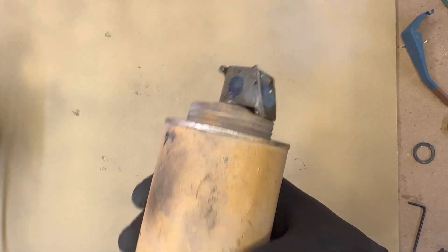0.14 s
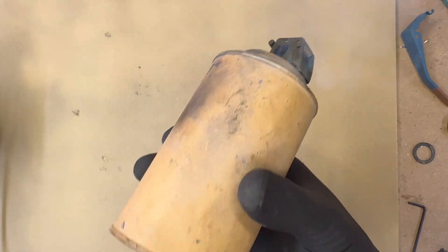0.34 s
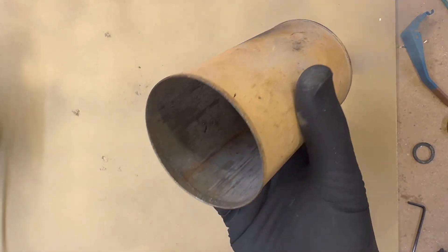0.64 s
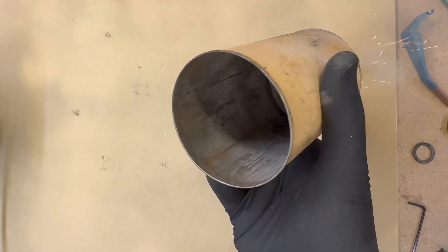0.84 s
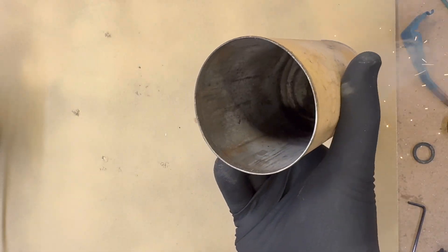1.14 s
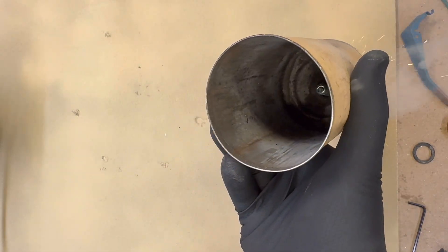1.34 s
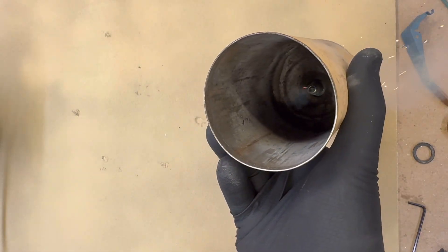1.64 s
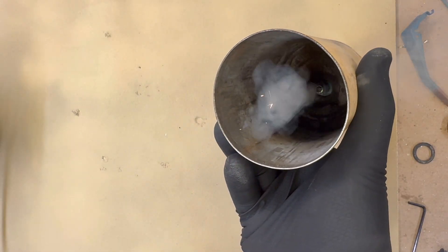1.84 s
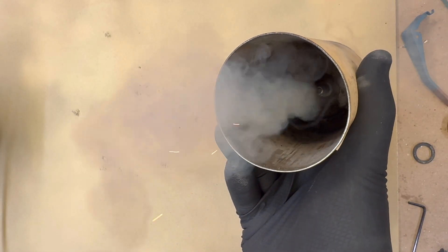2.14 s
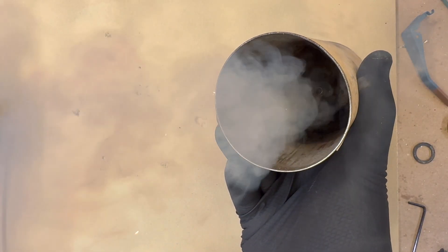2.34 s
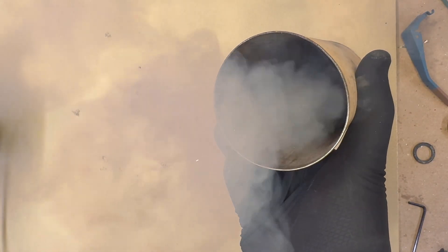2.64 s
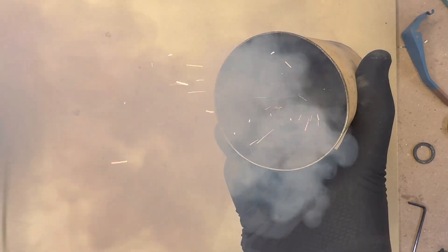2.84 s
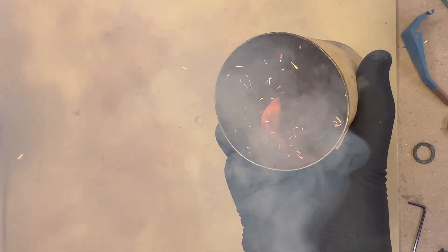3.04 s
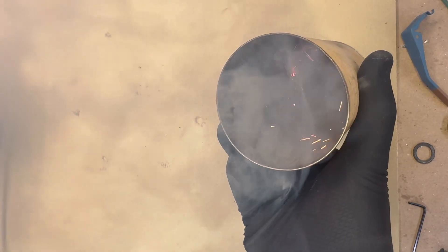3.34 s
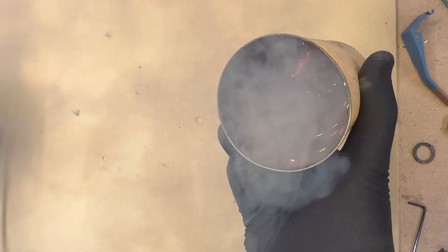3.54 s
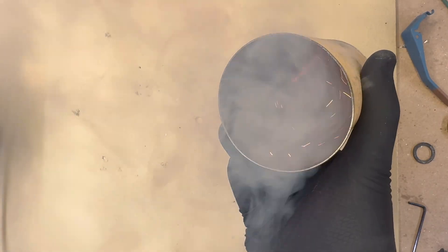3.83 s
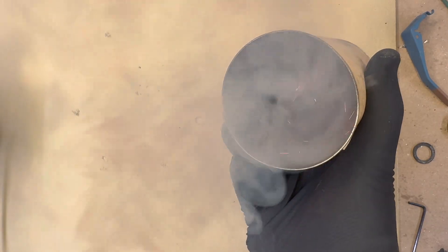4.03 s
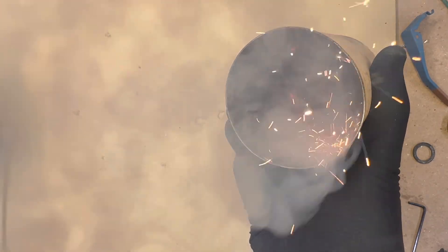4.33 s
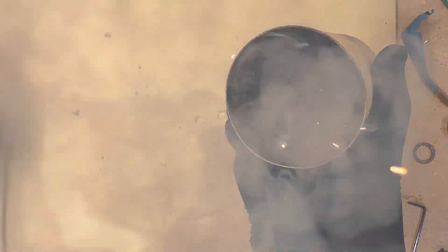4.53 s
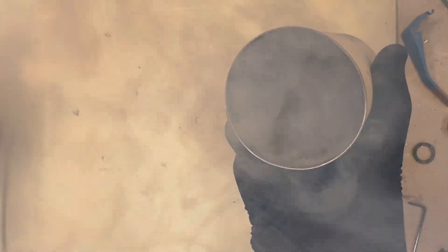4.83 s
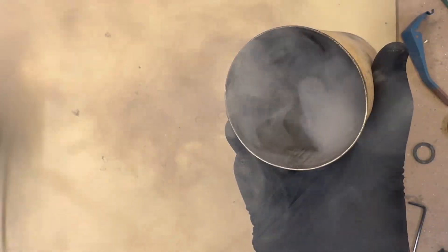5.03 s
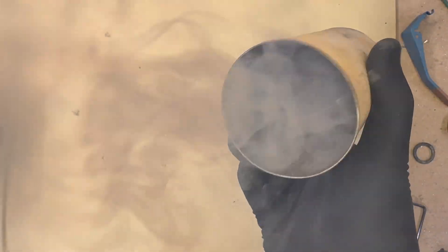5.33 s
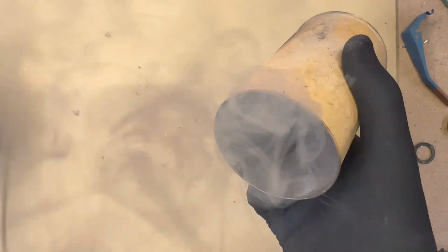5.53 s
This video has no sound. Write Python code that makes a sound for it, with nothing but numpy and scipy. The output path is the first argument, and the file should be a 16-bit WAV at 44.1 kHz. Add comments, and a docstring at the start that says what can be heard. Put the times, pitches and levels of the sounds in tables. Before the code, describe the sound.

A sharp metallic crack, a bright spitting hiss and a soft fizz lead to a brief hollow flare in a metal canister.

```python
"""Smoke grenade fuze in an empty can

A fuze fires in a steel canister held over a workbench. The primer's jet swells to a crack, then the
fuze head hisses and spits slag while the can is turned over. The delay charge fizzes inside the open
can, the ignition charge flares into a hollow roar and dies, and last sparks tick over a machine hum."""
import sys
import numpy as np
from scipy import signal
from scipy.fft import rfft, irfft, next_fast_len
from scipy.io import wavfile
from scipy.ndimage import map_coordinates

SR = 44100
rng = np.random.default_rng(int(sys.argv[2]) if len(sys.argv) > 2 else 0)


def to_wav(s):
    """Save 16-bit WAV."""
    ch = np.atleast_2d(s).T  # columns
    pcm = np.round(np.clip(ch, -1, 1) * 32767)  # PCM
    wavfile.write(sys.argv[1], SR, pcm.astype(np.int16))


N = 250355
TIME = np.arange(N) / SR


# The jet's bright hiss and its fuller body. Each row: frequency in Hz, relative level in dB.
JET_HISS_EQ = [(150, -29.5), (1000, -15.5), (3500, -9.5), (5300, -3), (6700, -9.5), (8000, 0), (9600, -0.5),
               (10500, 0.5), (14300, -6), (15500, -15.5)]
JET_BODY_EQ = [(30, -37.5), (130, -5), (500, -3.5), (800, -6.5), (1150, 1), (2100, -6), (2650, -7),
               (3300, -9.5), (6500, -4.5), (15000, -24.5)]
# The ring of the steel fuze head. Each row: frequency in Hz, width in Hz, relative level in dB.
HEAD_MODES = [(2690, 60, 7.5), (5630, 55, -5), (7770, 64, 1), (9190, 90, 1.5)]

def primer(crack_s=.221, end_s=.2435, attack_s=.011, t60=.022):
    """The primer flashes; its jet swells, blows the vent clear with a crack and rings the fuze head."""
    gate = held(0, end_s, attack_s, t60)
    flash = amp(-19 - 96.5 * TIME) * gate
    pressure = amp(-9.5 - 100 * np.maximum(crack_s - TIME, 0)) * gate
    crack = held(crack_s, end_s, attack_s, t60)
    hiss_gain = np.linalg.norm([flash, pressure, amp(-9.5) * crack], axis=0)  # stages add in power
    body_gain = np.linalg.norm([amp(-3.5) * flash, amp(-17.5) * pressure, amp(-11) * crack], axis=0)
    hiss = hiss_gain * coloured(turbulence(.59, 150, 2.5, 900), JET_HISS_EQ)
    body = body_gain * coloured(turbulence(.56, 150, 3.5, 900), JET_BODY_EQ)
    jet = hiss + body
    return jet + amp(-15.5) * resonate(jet, HEAD_MODES)


# Pops of slag and gas. Each row: start in seconds, level in dB, centre in Hz, t60 in seconds.
GAS_POPS = [(.002, -15, 3200, 0.15), (.012, -13, 9050, 0.045), (.081, -9.5, 5000, 0.025),
            (.089, -14.5, 3500, 0.059), (.106, -16.5, 1418, 0.042), (.112, -24.5, 452, 0.078),
            (2.957, -25, 646, .08), (2.97, -25.5, 1900, 0.047), (3.063, -27, 9500, .12),
            (3.087, -20, 1502, 0.081)]

def pops():
    """Pockets of gas burst as the primer and later the ignition charge catch."""
    out = np.zeros(N)
    for start, db, hz, t60 in GAS_POPS:
        burst = signal.lfilter(*signal.iirpeak(hz, Q=1.5, fs=SR), rng.standard_normal(SR // 8))
        add(out, start, amp(db) * decay(t60) * unit(burst))
    return out


# The charge catches, burns and flares once more.
# Each row: start and end in seconds, relative levels of roar and rush in dB.
FLARE_BURNS = [(2.96, 3.002, -25, -35.5), (3.061, 4.137, -26, -30.5), (4.234, 4.353, -25.5, -31.5)]
# Surges and dips in the gas flow. Each row: time in seconds, gain in dB.
FLARE_FLOW = [(3.02, -0.5), (3.09, 2.5), (3.16, -0.5), (3.27, 1), (3.39, -6), (3.45, 2), (3.53, -1),
              (3.64, 2.5), (3.73, -1.5), (3.98, 0.5), (4.045, -4.5), (4.075, -0.5)]
# The can's hollow roar, before heat bends it. Each row: frequency and width in Hz, relative level in dB.
ROAR_MODES = [(684, 46, 0), (790, 110, -12), (2090, 260, -13.5), (3400, 110, -15), (4000, 110, -15)]
# The rush of gas, before heat bends it. Each row: frequency in Hz, relative level in dB.
RUSH_EQ = [(50, -12), (220, -2.5), (500, -23), (1400, -7.5), (2300, 0), (2950, -13.5), (3400, -3),
           (4450, -10), (5100, 6), (7000, -6.5), (7900, -2), (8800, -11.5), (9600, -7.5), (13500, -16.5),
           (15500, -33.5)]

def flare(rush_lag_s=.008, rumble_hz=(243, 438)):
    """The ignition charge roars in the can; hot gas lifts all its resonances together."""
    roar = rush = 0
    for start, end, roar_db, rush_db in FLARE_BURNS:
        roar += amp(roar_db) * held(start, end, attack_s=.023, t60=.25)
        rush += amp(rush_db) * held(start + rush_lag_s, end, attack_s=.052, t60=.4)
    rush *= amp(np.interp(TIME, [3.25, 3.5], [3, 0]))  # eases off as the nozzle burns wide
    sound_speed = .935 + .08 * (TIME - FLARE_BURNS[0][0])  # a ratio that scales every frequency
    warmed = lambda x: map_coordinates(x, [np.cumsum(sound_speed)], mode="wrap")
    surge = amp(curves(FLARE_FLOW)[0]) * unit(amp(1.3 * wobble(65)))
    hollow = roar * amp(1.1) * warmed(can_air(turbulence(.4, 30, 1.5, 300), ROAR_MODES))
    rumble = roar * amp(-20.5) * unit(band(turbulence(.96, 30, 2, 200), rumble_hz, order=2))
    gas = rush * amp(-4.5) * warmed(coloured(turbulence(.18, 30, 1.6, 700), RUSH_EQ))
    wall_delay_ms = .647 + .025 * wobble(12)  # the flame wanders between the steel walls
    return surge * (hollow + rumble + echoed(gas, wall_delay_ms, strength=.3))


# Whistles at the nozzle. Each row: start and end in seconds, first and last pitch in Hz, level in dB.
NOZZLE_WHISTLES = [(2.987, 3.149, 2976, 3180, -34), (3.044, 3.075, 4420, 5670, -29),
                   (3.161, 3.361, 3235, 3330, -39), (4.248, 4.382, 3570, 3570, -36)]

def whistles():
    """Unsteady edge tones, most of them rising, sound as hot gas squeezes past slag in the nozzle."""
    out = np.zeros(N)
    unrest = unit(wobble(130) + 1j * wobble(130))  # shakes both level and phase
    for start, end, from_hz, to_hz, db in NOZZLE_WHISTLES:
        blowing = unrest[(TIME > start) & (TIME < end)]
        phase = 2 * np.pi * np.cumsum(np.linspace(from_hz, to_hz, len(blowing))) / SR
        tone = np.sqrt(2) * np.real(blowing * np.exp(1j * phase))
        add(out, start, amp(db) * signal.windows.tukey(len(blowing), .3) * tone)
    return out


# The hiss with the head facing us, then behind the can. Each row: frequency in Hz, relative level in dB.
FACING_EQ = [(100, -18.5), (900, -19), (1900, -6.5), (2700, -10), (5000, -6.5), (7500, -4), (9500, 2),
             (11500, -5.5), (14000, -13), (15500, -20)]
BEHIND_EQ = [(100, -47), (400, -17.5), (1000, -22), (2900, -11.5), (4050, -9.5), (4700, -3.5),
             (6500, -11.5), (7900, 3), (8800, -2.5), (9800, -2), (11500, -11), (13500, -20), (15000, -9),
             (15800, -21.5)]
# The bounce off the bench. Each row: time in seconds, delay in milliseconds, strength as a gain.
BENCH_BOUNCE = [(.27, 1.01, .4), (.5, .82, .5), (.78, .67, .42), (1.2, .52, .15)]

def vent():
    """Gas hisses from the fuze head; the turning can shades the head and the bench echo sweeps."""
    angle = np.interp(TIME, [.55, 1], [0, np.pi / 2])
    facing = np.cos(angle) * coloured(turbulence(.9, 51, 3.5, 850), FACING_EQ)
    behind = np.sin(angle) * coloured(turbulence(1, 60, 4.1, 700), BEHIND_EQ)
    return echoed(vent_flow() * (facing + behind), *curves(BENCH_BOUNCE))


def vent_flow(open_s=.295, clear_s=.87, shut_s=1.627):
    """Envelope of the gas at the fuze head: it clears, holds and stops when slag seals the vent."""
    level_db = np.interp(TIME, [open_s, clear_s], [-34, -30.5])
    return amp(level_db) * held(open_s, shut_s, attack_s=.06, t60=.37)


# Spits of slag. Each row: time of the peak in seconds, level in dB.
SLAG_SPITS = [(0.389, -30), (.789, -19.5), (0.827, -23), (.859, -34.5), (.897, -14), (0.912, -22.5),
              (0.923, -24), (0.979, -23), (1.065, -22), (1.073, -15), (1.0796, -11), (1.168, -28.5),
              (1.19, -20.5), (1.222, -23), (1.338, -17.5), (1.343, -19.5), (1.371, -23), (1.455, -15.5),
              (1.464, -15.5), (1.554, -19)]
# Their sharp, bright tone. Each row: frequency in Hz, relative level in dB.
SPIT_EQ = [(60, -25), (170, -14.5), (600, -4), (1050, -11), (2400, -5.5), (4000, 2), (5200, -6.5),
           (8000, 3.5), (10000, 0.5), (12000, -13.5), (15000, -7.5)]

def spits(half_width_s=.0024):
    """Molten slag sputters through the vent in short grainy bursts, with small sparks between."""
    bursts = np.zeros(N)
    t = np.arange(SR // 50) / SR - .01
    for peak_s, db in SLAG_SPITS:
        add(bursts, peak_s + t[0], amp(db) / (1 + (t / half_width_s) ** 4))
    crackle = unit(amp(8 * np.tanh(wobble(420))))
    sparks = amp(-3) * vent_flow() * crackle * np.interp(TIME, [.6, .8], [.4, 1])
    return coloured((bursts + sparks) * turbulence(.73, 400, .86, 1800), SPIT_EQ)


# The ride of the fizz. Each row: time in seconds, relative levels of hollow tone and hiss in dB.
FIZZ_LEVELS = [(1.8, -41.5, -47.5), (2.108, -45, -45), (2.286, -45, -53), (2.57, -46, -48.5),
               (2.722, -38.5, -39.5), (2.93, -41.5, -44)]
# The hollow tone of the air in the can. Each row: frequency and width in Hz, relative level in dB.
FIZZ_MODES = [(630, 45, 0), (760, 220, -12), (1930, 190, -7), (2980, 190, -15), (3550, 450, -20)]
# The sizzle on top. Each row: frequency in Hz, relative level in dB.
FIZZ_EQ = [(100, -14), (1000, 2), (4200, -16), (5600, 2.5), (6700, -13), (8100, 7), (9200, -4), (11000, 1),
           (11400, -6), (12100, -6), (13300, -9), (14100, -11), (15500, -28)]

def fizz():
    """The delay charge burns through into the can, which sounds like a pipe closed at one end."""
    hollow_gain, hiss_gain = amp(curves(FIZZ_LEVELS)) * held(1.66, 2.94, attack_s=.13, t60=.15)
    hollow = hollow_gain * amp(.5) * can_air(turbulence(1.1, 40, 1.5, 400), FIZZ_MODES)
    hiss = hiss_gain * amp(.3) * coloured(turbulence(.44, 40, 1.8, 550), FIZZ_EQ)
    return hollow + hiss


def can_air(eddies, modes):
    """Eddies with little treble ring the can's air; its mouth radiates little below the lowest tone."""
    return unit(band(resonate(eddies, modes), (560, 7000), order=3))


# The last sparks. Each row: start in seconds, relative level in dB.
SPARK_TICKS = [(4.571, -41.5), (4.585, -40), (4.793, -41.5), (4.854, -46), (4.9172, -48), (5.1795, -35.5),
               (5.451, -45.5)]
# Faint puffs of after-hiss. Each row: time of the peak in seconds, level in dB, half width in seconds.
HISS_PUFFS = [(4.498, -59, .06), (5.375, -65.5, .06)]
# The thin tone of both. Each row: frequency in Hz, relative level in dB.
EMBER_EQ = [(300, -30), (1400, -5.5), (3400, -2), (9200, 0.5), (15000, -10)]

def embers():
    """Last sparks tick against the steel among faint puffs of hiss."""
    ticks = np.zeros(N)
    snap_and_tail = decay(.01) + amp(-17.5) * decay(.058)
    for start, db in SPARK_TICKS:
        add(ticks, start, amp(db - 7) * snap_and_tail)
    puffs = sum(amp(db) * np.exp(-((TIME - peak_s) / half_s) ** 2) for peak_s, db, half_s in HISS_PUFFS)
    return coloured((ticks + puffs) * rng.standard_normal(N), EMBER_EQ)


def workspace(x, t60, wet_db):
    """Close surfaces give a short, dense tail."""
    t = np.arange(SR // 3) / SR
    tail = rng.standard_normal(len(t)) * amp(-60 * t / t60) * (t > .002)
    return x + amp(wet_db) * signal.fftconvolve(x, tail / np.linalg.norm(tail))[:N]


# The machine's low tones. Each row: pitch in Hz, level in dB.
HUM_TONES = [(59.5, -58), (96.9, -58)]
# Dark room tone. Each row: frequency in Hz, relative level in dB.
ROOM_EQ = [(25, -1), (55, 17.5), (200, 10.5), (400, 3.5), (700, 6.5), (1100, -3), (2700, -11.5),
           (9000, -12), (15000, -14.5)]

def machine_hum(drone_peak_s=4.65, drone_half_s=.42):
    """A machine hums over quiet room tone; a fluttering low drone swells and fades."""
    tone = lambda hz, drift: np.sqrt(2) * np.sin(2 * np.pi * hz * TIME + drift * wobble(3.9))
    hum = sum(amp(db) * tone(hz, drift=.3) for hz, db in HUM_TONES)
    swell = 1 / (1 + ((TIME - drone_peak_s) / drone_half_s) ** 2)
    drone = amp(-50 + 2.5 * wobble(25)) * swell * tone(hz=97, drift=.9)
    return hum + drone + amp(-60.5) * coloured(rng.standard_normal(N), ROOM_EQ)


def turbulence(flutter_db, flutter_rate, grain_db, grain_rate):
    """White noise of rms 1, roughened by uneven burning: a flutter and fast grains."""
    roughness_db = flutter_db * wobble(flutter_rate) + grain_db * wobble(grain_rate)
    return unit(rng.standard_normal(N) * amp(roughness_db))


def wobble(rate):
    """A smooth random curve, rate knots a second."""
    knots = rng.standard_normal(int(N * rate / SR) + 4)
    fine = signal.resample_poly(knots, 10, 1)
    return np.interp(TIME * rate * 10, np.arange(len(fine)), fine)


def held(start, end, attack_s, t60):
    """An envelope that rises to 1 by start, holds until end and dies by 60 dB in t60."""
    attack = np.clip(1 + (TIME - start) / attack_s, 0, 1) ** 2
    return attack * amp(-60 * np.maximum(TIME - end, 0) / t60)


def decay(t60):
    """A short envelope that dies by 60 dB in t60."""
    return amp(-60 * np.arange(SR // 8) / SR / t60)


def curves(rows):
    """One automation curve for each column after the time."""
    times, *columns = np.transpose(rows)
    return [np.interp(TIME, times, column) for column in columns]


def filtered(x, response):
    """x shaped by a gain that depends on frequency."""
    size = next_fast_len(N + SR // 2)
    return irfft(rfft(x, size) * response(np.fft.rfftfreq(size, 1 / SR)), size)[:N]


def coloured(x, eq):
    """x through an EQ curve that keeps the power of white noise."""
    hz, db = np.transpose(eq)
    return filtered(x, lambda f: unit(amp(np.interp(np.log(f + 1), np.log(hz), db))))


def resonate(x, modes):
    """x through resonances that together keep the power of white noise."""
    peak = lambda f, hz, width: 1j * f * width / (hz * hz - f * f + 1j * f * width)
    return filtered(x, lambda f: unit(sum(amp(db) * peak(f, hz, width) for hz, width, db in modes)))


def band(x, edges_hz, order):
    """x through a band-pass filter."""
    return signal.lfilter(*signal.butter(order, edges_hz, "bandpass", fs=SR), x)


def echoed(x, delay_ms, strength):
    """x plus one reflection whose path length changes."""
    return x + strength * map_coordinates(x, [(TIME - delay_ms / 1000) * SR], order=2)


def add(track, start, sound):
    """Mix a short sound into a track at start seconds."""
    part = track[max(round(start * SR), 0):][:len(sound)]
    part += sound[:len(part)]


def amp(db):
    """Decibels to gain."""
    return np.exp(np.asarray(db) * np.log(10) / 20)


def unit(x):
    """Scale to rms 1."""
    return x / np.sqrt(np.mean(np.abs(x) ** 2) + 1e-20)


def scene():
    """The burning fuze in a tight space, over the hum."""
    fuze = primer() + pops() + vent() + spits() + fizz() + flare() + whistles() + embers()
    return (workspace(fuze, t60=.063, wet_db=-9) + machine_hum())[None]


def record(dry):
    """The microphone overloads softly on the crack and keeps nothing above its band limit."""
    clipped = dry[0] / (1 + np.abs(dry[0]) ** 8) ** (1 / 8)
    return filtered(clipped, lambda hz: hz < 15800)[None]


dry = scene()
out = record(dry)
to_wav(out)
```